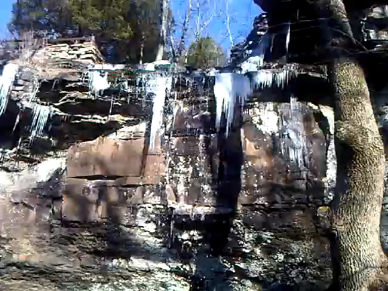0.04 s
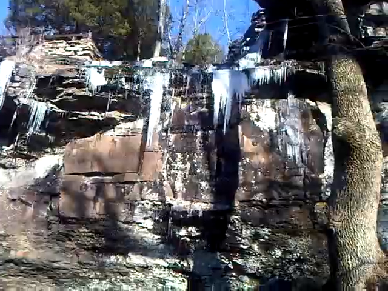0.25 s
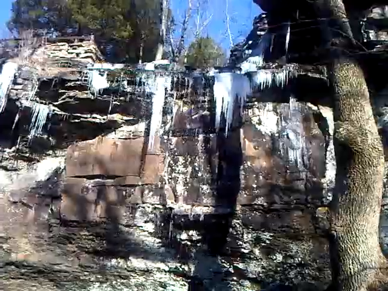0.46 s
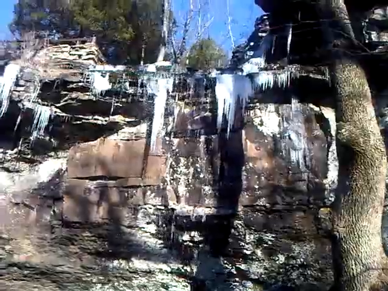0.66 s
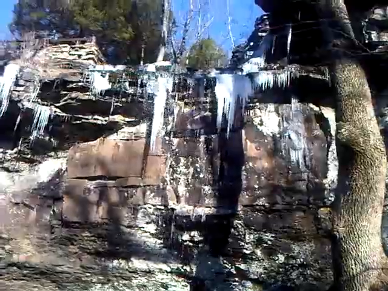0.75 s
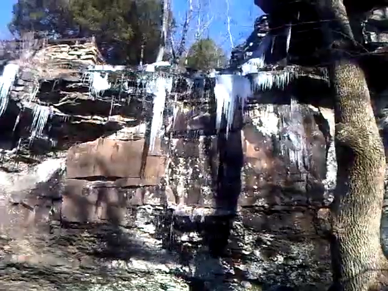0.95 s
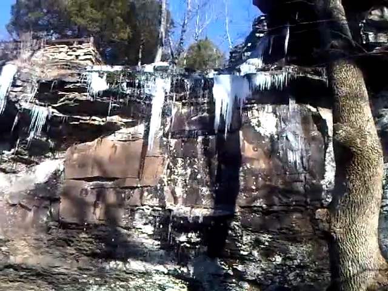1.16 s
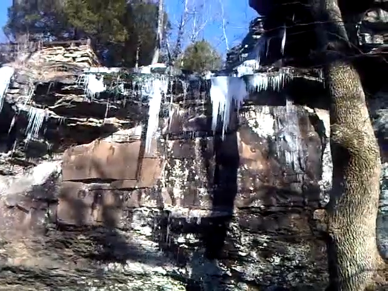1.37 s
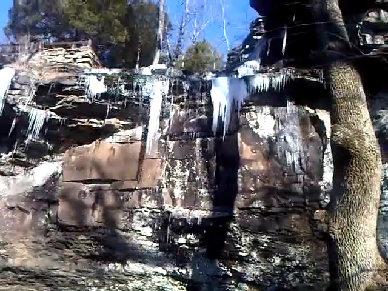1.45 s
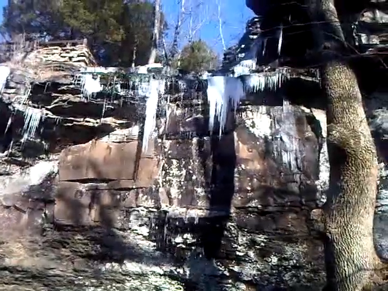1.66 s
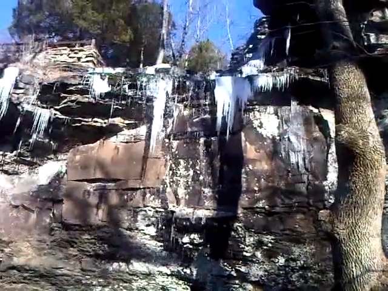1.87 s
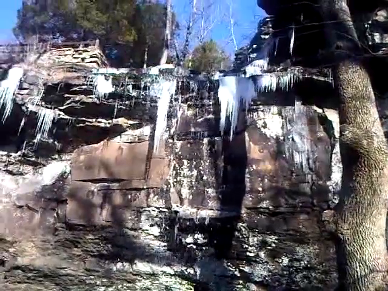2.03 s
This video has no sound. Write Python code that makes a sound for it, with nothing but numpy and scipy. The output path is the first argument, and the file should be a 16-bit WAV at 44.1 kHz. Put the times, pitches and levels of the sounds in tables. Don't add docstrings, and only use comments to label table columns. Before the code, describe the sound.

After a moment of silence, a finger clicks and thumps the hand-held camera; immediately a steady waterfall follows, low hollow roar, spray hiss and dense drops pattering on stone, quiet and slightly distant, with muffled treble.

```python
import sys
import numpy as np
from scipy import signal
from scipy.fft import rfft, irfft, next_fast_len
from scipy.io import wavfile
from scipy.ndimage import uniform_filter1d, map_coordinates

SR = 44100
rng = np.random.default_rng(int(sys.argv[2]) if len(sys.argv) > 2 else 0)


def how_loud(loudness_db):
    steps = np.asarray(loudness_db, float) / 20
    return 10 ** steps


def store_pcm(level_fs):
    pcm = np.round(np.clip(level_fs, -1, 1) * 32767).astype(np.int16)
    wavfile.write(sys.argv[1], SR, np.atleast_2d(pcm).T)


N = 92610

# frequency_hz, level_db
MIC = [(5500, -9.5), (6500, -7.5), (7300, -13), (8050, -23), (8400, -24.5), (8900, -34.5), (9300, -65),
       (22000, -120)]


def unit(x):
    return x / np.sqrt(np.mean(x ** 2) + 1e-20)


def along(points, hz):
    f, v = np.transpose(points)
    return np.interp(np.log(hz + 1), np.log(f + 1), v)


def wobble(rate):
    knots = rng.standard_normal(int(N * rate / SR) + 4)
    return map_coordinates(knots, [np.arange(N) * rate / SR])


def filtered(x, response):
    m = next_fast_len(N + SR // 2)
    return irfft(rfft(x, m) * response(np.fft.rfftfreq(m, 1 / SR)), m)[..., :N]


def force(s, db, up_ms, down_ms):
    ms = np.arange(N) / SR * 1000 - s * 1000
    return how_loud(db) * np.exp(np.minimum(ms / up_ms, -ms / down_ms))


def finger():
    # peak_s, level_db, build_up_ms, let_go_ms
    pushes = [
        (.1581, -39, .03, .5),
        (.16132, -22, .9, .3),
        (.16335, -14.3, .7, .9),
    ]
    # peak_s, level_db, build_up_ms, let_go_ms
    rebounds = [
        (.162, -27.5, .3, .35),
        (.1658, -29, 1, 1),
    ]
    # peak_s, level_db, build_up_ms, let_go_ms
    release = (.2088, -43.5, .3, .7)
    pad_hz, case_hz, case_damp = 3500, 78, .72

    tick, *presses = [force(*p) for p in pushes]
    backward = sum(force(*p) for p in [*rebounds, release])
    press = filtered(sum(presses) - backward, lambda hz: 1 / (1 + (hz / pad_hz) ** 2))

    def casing(hz):
        return -hz * hz / (case_hz ** 2 - hz * hz + 2j * case_damp * case_hz * hz)

    return filtered(tick + press, casing)


def rush(shape_db, patchy_db):
    z = signal.stft(rng.standard_normal(N), nperseg=256)[2]
    field = uniform_filter1d(rng.standard_normal(z.shape), size=5, axis=0)
    field = uniform_filter1d(field, size=8, axis=1)
    x = signal.istft(z * how_loud(patchy_db * unit(field)), nperseg=256)[1][:N]
    return unit(filtered(x, lambda hz: how_loud(shape_db(hz))))


def hollow_db(hz):
    # centre_hz, width_hz, lift_db
    hollow = [(1340, 330, 7.5), (2120, 626, 8), (5424, 1390, 12)]
    return sum(db * np.exp(-.5 * ((hz - c) / (w / 2)) ** 2) for c, w, db in hollow)


def cliff_roar(flow_db, mean_db, surge_db):
    # frequency_hz, density_db
    spectrum = [(20, -28.5), (60, -26), (200, -8), (480, -12), (800, -5), (1100, -11), (3300, -10),
                (9000, -22)]
    roar = rush(lambda hz: along(spectrum, hz) + hollow_db(hz) + along(MIC, hz), patchy_db=0.98)
    return roar * how_loud(2 + mean_db + 0.49 * (flow_db - mean_db) + surge_db)


def spray_hiss(flow_db, surge_db):
    centre_hz, width_log = 5390, 0.24

    def shape_db(hz):
        return -4.3 * (np.log((hz + 1) / centre_hz) / width_log) ** 2 + along(MIC, hz)

    spray = rush(shape_db, patchy_db=-2.0)
    return spray * how_loud(-6.5 + flow_db + surge_db + 1.9 * wobble(60))


def grains(s, db, hz, cycles):
    k = np.arange(160)
    u = k / SR * hz[:, None]
    wave = how_loud(db)[:, None] * np.sin(2 * np.pi * u) * np.exp(-u / cycles) * (1 - np.exp(-2 * u))
    places = (s * SR).astype(int)[:, None] + k
    return np.bincount(places.ravel(), wave.ravel(), N + SR)[:N]


def drops_on_stone(flow_db):
    # start_s, peak_db, pitch_hz
    splats = [(.298, -45, 2200), (.4218, -40, 5200), (.4459, -37, 5000), (.5941, -40, 5200),
              (.8876, -38, 5500), (.962, -39, 5300), (1.0412, -45, 2100), (1.0645, -40, 5600),
              (1.258, -44, 1400), (1.3078, -38, 5300), (1.5147, -39, 5300), (1.6925, -45, 2200),
              (1.7161, -35, 6000), (1.7547, -35, 5500), (1.9734, -37, 5100)]
    rate_per_s, centre_hz, spread_log, scatter_db = 800, 5200, .13, 3.3

    c = rng.random((int(rate_per_s * N / SR), 4))
    hz = np.clip(centre_hz * np.exp(spread_log * 2.5 * (c[:, 1] + c[:, 2] - 1)), 300, 9000)
    db = -scatter_db * np.log(1 - c[:, 3] * .99)
    small = unit(grains(c[:, 0] * N / SR, db, hz, cycles=3)) * how_loud(-6 + flow_db)
    start_s, peak_db, pitch_hz = np.transpose(splats)
    large = grains(start_s, peak_db + 3, pitch_hz, cycles=3)
    return filtered(small + large, lambda hz: how_loud(along(MIC, hz) - MIC[0][1]))


def waterfall():
    # time_s, flow_db
    flow = [(0.17, -55), (0.374, -55.5), (0.432, -54.5), (1.152, -54), (1.324, -52), (1.33, -53.5),
            (1.738, -55), (1.75, -52.5), (1.84, -55), (2.1, -53.5)]
    s, db = np.transpose(flow)
    flow_db = np.interp(np.arange(N) / SR, s, db)
    surge_db = 0.23 * wobble(9)
    roar = cliff_roar(flow_db, db.mean(), surge_db)
    return roar + spray_hiss(flow_db, surge_db) + drops_on_stone(flow_db)


def scene():
    start_s, fade_s = .1595, .004
    t = np.arange(N) / SR
    water = waterfall() * np.clip((t - start_s) / fade_s, 0, 1)
    return (finger() + water)[None]


def top_cut(x):
    return signal.sosfilt(signal.butter(12, 8930, fs=SR, output="sos"), x)


def record(dry):
    open_s, close_s = .1578, .003
    t = np.arange(N) / SR
    mix = dry * (t > open_s) * np.clip((N / SR - t) / close_s, 0, 1)
    return top_cut(mix)


dry = scene()
out = record(dry)
store_pcm(out)
```